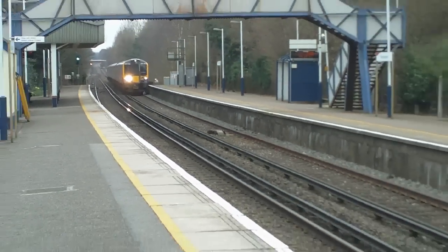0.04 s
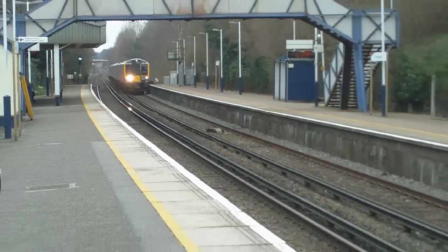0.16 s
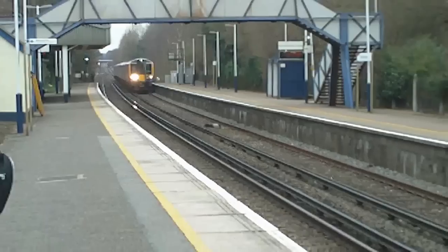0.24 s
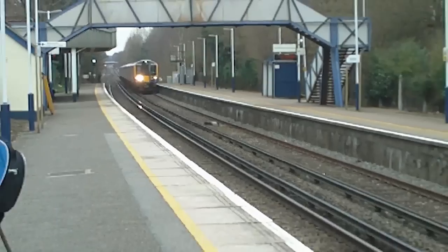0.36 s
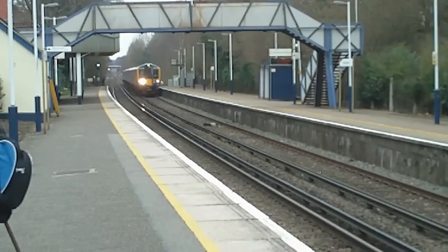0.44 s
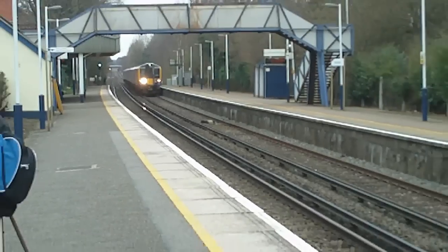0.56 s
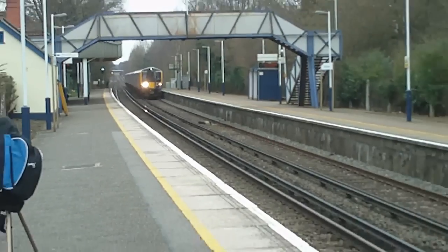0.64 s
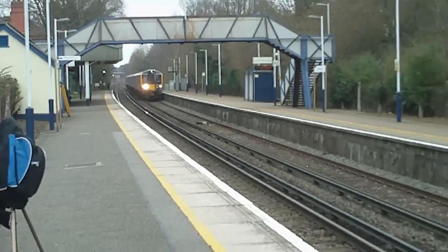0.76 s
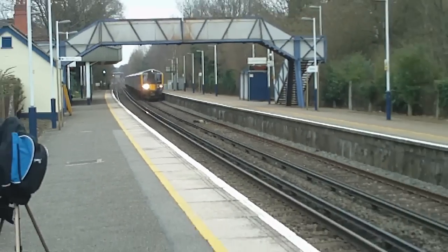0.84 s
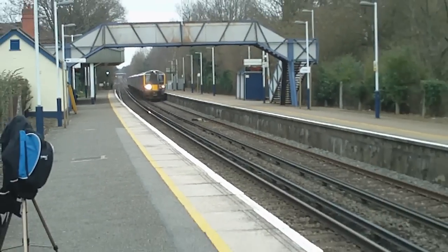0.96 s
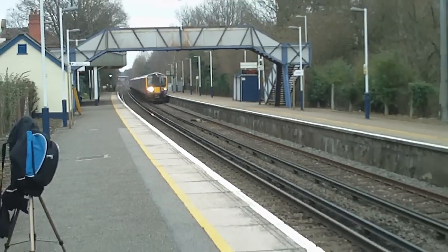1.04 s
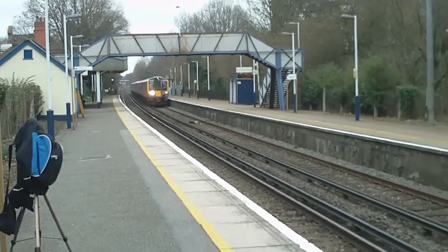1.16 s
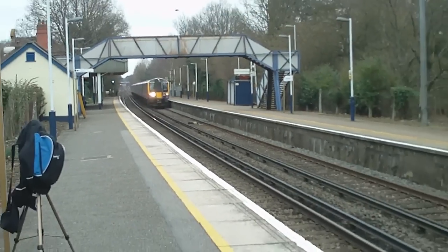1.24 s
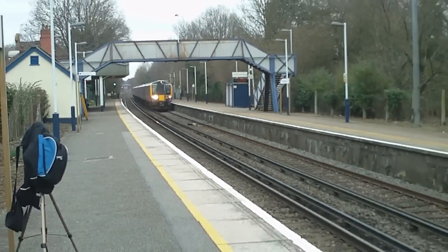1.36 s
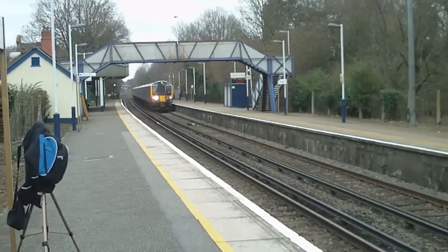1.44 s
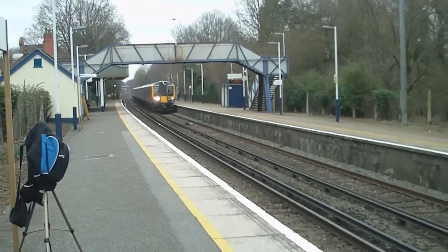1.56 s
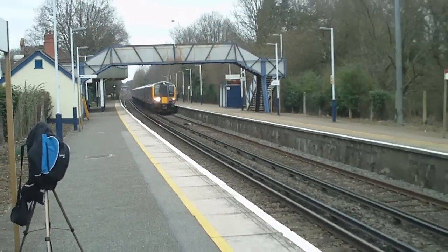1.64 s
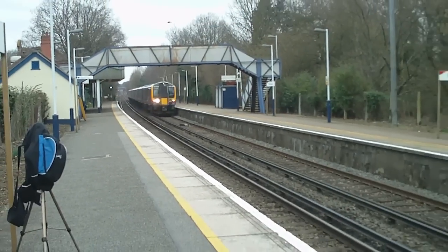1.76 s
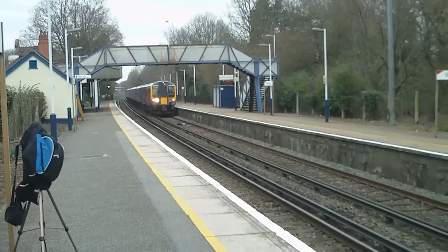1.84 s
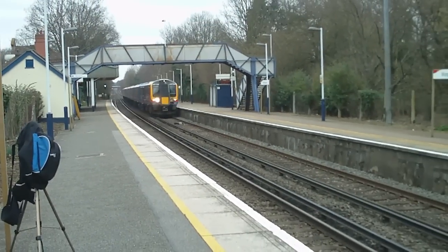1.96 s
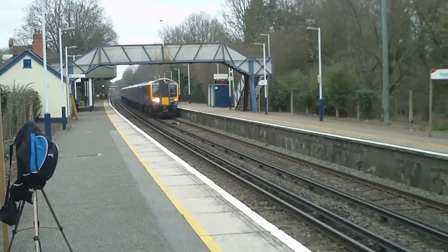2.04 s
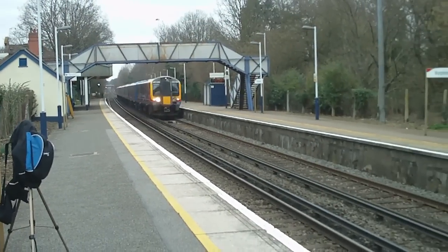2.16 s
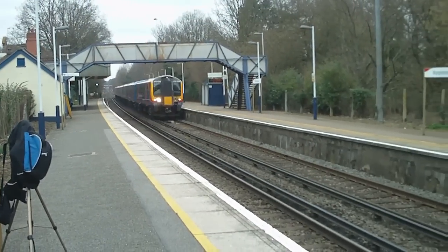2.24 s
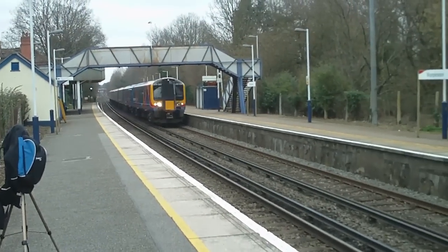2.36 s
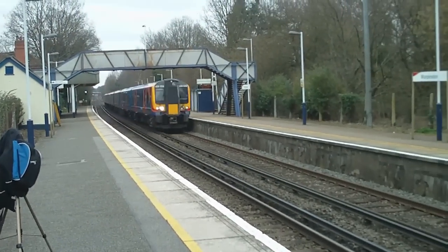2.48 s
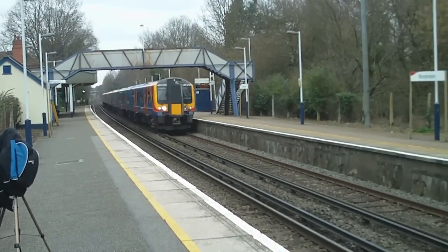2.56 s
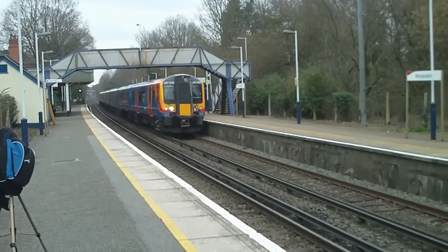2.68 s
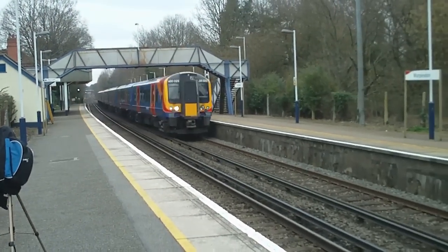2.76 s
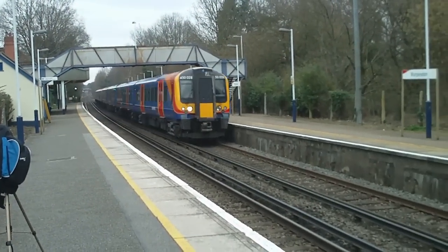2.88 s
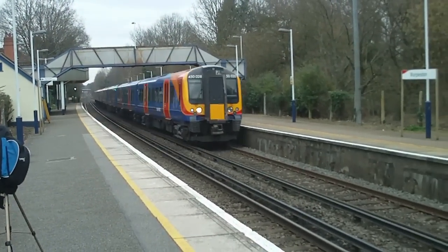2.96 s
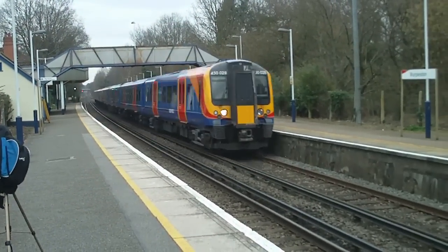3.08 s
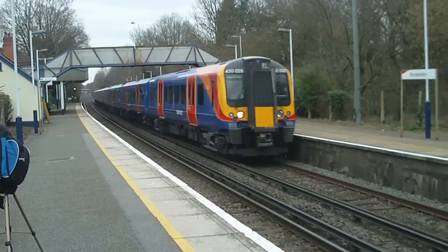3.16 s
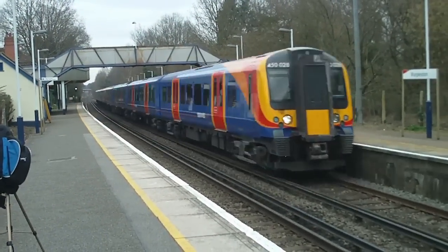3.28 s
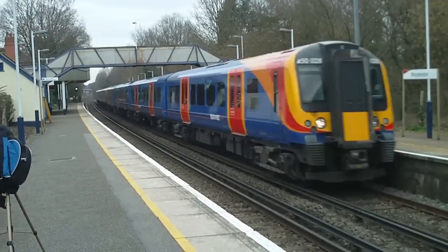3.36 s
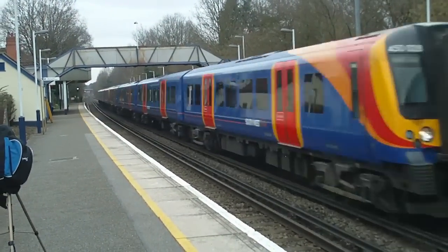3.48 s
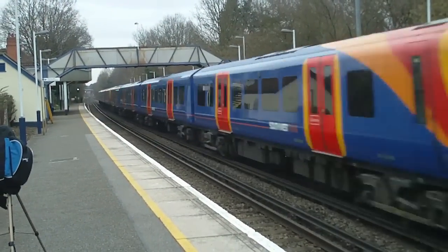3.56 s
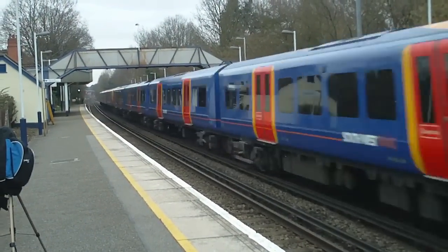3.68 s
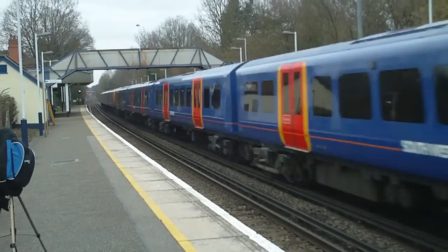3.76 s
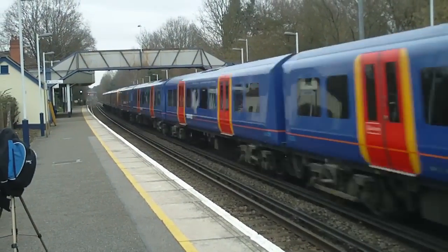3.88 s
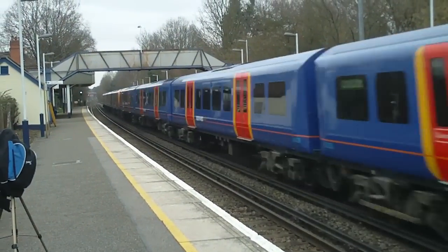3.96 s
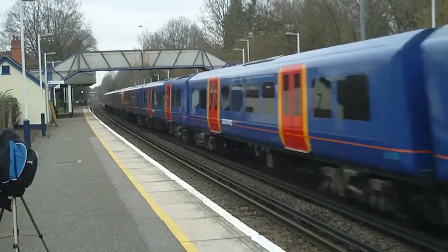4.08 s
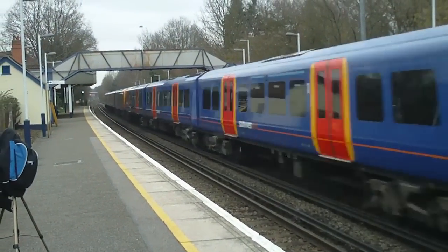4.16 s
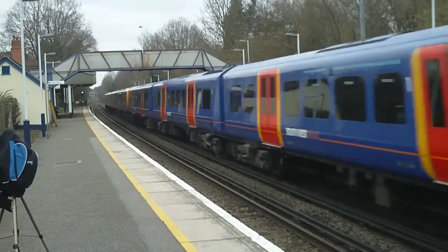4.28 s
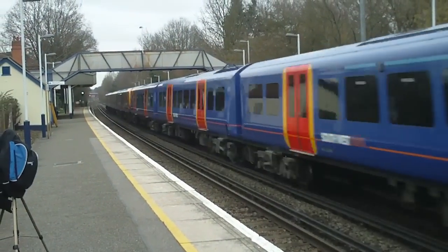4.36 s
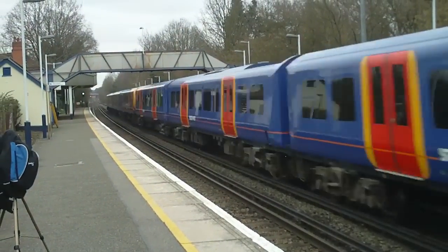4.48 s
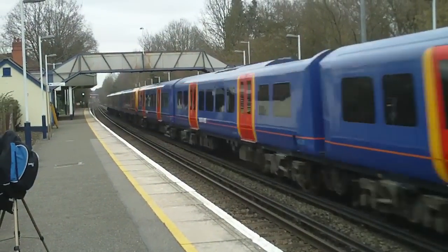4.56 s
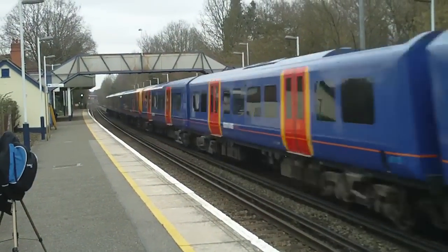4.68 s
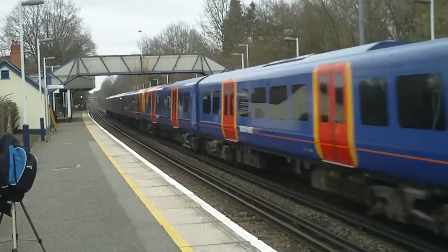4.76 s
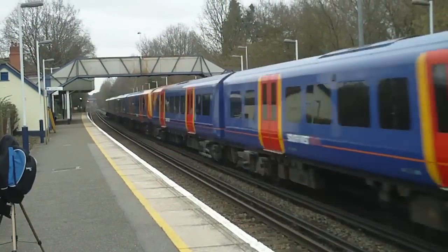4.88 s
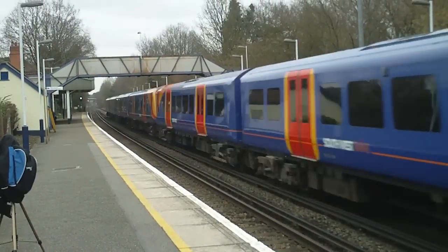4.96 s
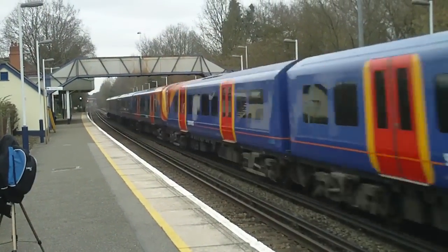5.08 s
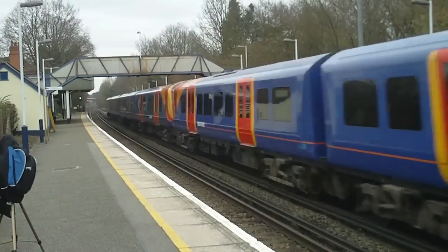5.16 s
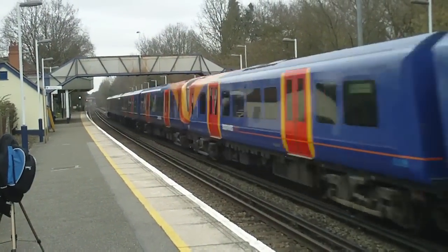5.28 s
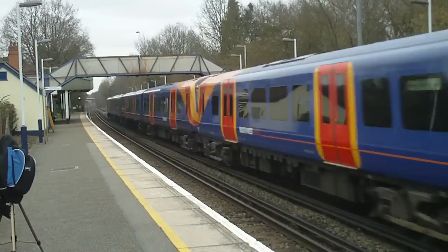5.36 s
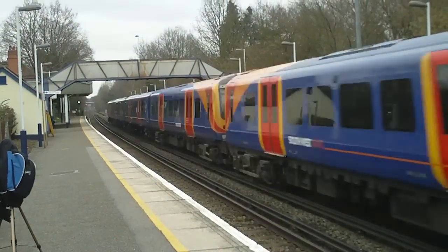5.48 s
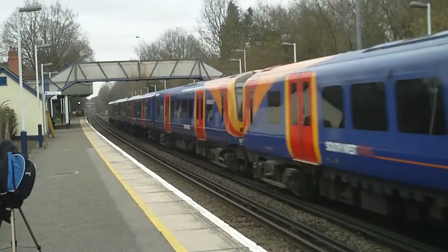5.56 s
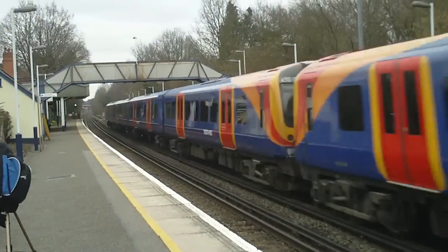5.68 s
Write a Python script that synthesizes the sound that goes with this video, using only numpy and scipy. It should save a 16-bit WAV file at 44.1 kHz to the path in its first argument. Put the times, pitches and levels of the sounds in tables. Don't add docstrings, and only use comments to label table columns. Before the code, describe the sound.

Outdoor stereo recording from a platform. At first only soft distant rumble, a faint bird note and thin, flickering rail ringing. The noise climbs steadily; one dry, hard camera click interrupts it about midway. The train's nose then sweeps by and wheel and wind noise stay strong, pulsing gently with each coach, with short squeals and tiny crackles.

```python
import sys
import numpy as np
from scipy import signal
from scipy.fft import rfft, irfft
from scipy.io import wavfile

SR = 44100
rng = np.random.default_rng(int(sys.argv[2]) if len(sys.argv) > 2 else 0)


def magnitude_from_level(level_db):
    exponent = np.asarray(level_db, float) / 20
    return 10 ** exponent


def transcribe(signal):
    frames = np.atleast_2d(signal).T
    limited = np.clip(frames, -1, 1)
    pcm = np.round(limited * 32767).astype(np.int16)
    wavfile.write(sys.argv[1], SR, pcm)


N = 252252

BAND_EDGES_HZ = [40, 330, 1000, 2200, 3500, 7500, 12000, 15500]
AIR_FROM_HZ = BAND_EDGES_HZ[4]
ARRIVAL_S, COACH_S = 3.606, 0.596
WHEELS_TURN_S = (3.46, 3.72)


def clock():
    return np.arange(N) / SR


def spectrum_hz():
    return np.maximum(np.arange(N // 2 + 1) * SR / N, 1)


def ramp(start_s, end_s):
    return np.clip((clock() - start_s) / (end_s - start_s), 0, 1)


def at_hz(points, hz):
    point_hz, point_db = np.transpose(points)
    return np.interp(np.log(hz), np.log(point_hz), point_db)


def together_db(*levels_db):
    return 10 * np.log10(sum(magnitude_from_level(db) ** 2 for db in levels_db))


def drift(rate_hz):
    r = np.exp(-80 * np.pi * rate_hz / SR)
    slow = signal.lfilter([1], [1, -2 * r, r * r], rng.standard_normal(N // 40 + 2002))
    slow = slow[2000:]
    return np.interp(np.arange(N) / 40, np.arange(len(slow)), slow / slow.std())


def resonate(x, hz, width_hz):
    r = np.exp(-np.pi * width_hz / SR)
    poles = [1, -2 * r * np.cos(2 * np.pi * hz / SR), r * r]
    return signal.lfilter([(1 - r * r) / 2, 0, (r * r - 1) / 2], poles, x)


def band_levels():
    # time in seconds, loudness in dB.
    approach = [
        (0.0, -53),
        (1.15, -47),
        (2.17, -41),
        (2.82, -35.5),
        (2.99, -35),
        (3.55, -25.5),
        (3.78, -21.5),
        (4.6, -19.5),
        (5.43, -19.5),
        (5.72, -18),
    ]
    # level alongside in dB, share of the approach followed,
    # quiet station in dB, swell per bogie pair in dB, gain in dB per second as the rake fills the platform.
    bands = [
        (-41, 1.03, -107, 1.5, -2),
        (-26, 0.99, -51.5, 2, -1.25),
        (-23, 1.26, -54.5, -0.35, 0.56),
        (-35.5, 0.93, -70, -0.2, 1.76),
        (-35, 1.16, -78, 0.5, -0.64),
        (-48, 1.25, -86.5, 0, -0.94),
        (-62.5, 0.85, -87, 1, -2),
    ]
    alongside_db, first_bogies_s = -21, 3.83
    lull_s, lull_length_s, lull_db = 3.98, .22, -3.0
    t = clock()
    closeness_db = np.interp(t, *np.transpose(approach))
    since_arrival = np.maximum(t - ARRIVAL_S, 0)
    lull = lull_db * np.exp(-(2 * (t - lull_s) / lull_length_s) ** 2)
    bogies = np.cos(2 * np.pi * (t - first_bogies_s) / COACH_S) * ramp(*WHEELS_TURN_S)
    levels = []
    for low_hz, (top_db, share, idle_db, swell_db, gain_db) in zip(BAND_EDGES_HZ, bands):
        train_db = top_db + share * (closeness_db - alongside_db)
        train_db = train_db + swell_db * bogies + gain_db * since_arrival
        if low_hz == BAND_EDGES_HZ[3]:
            train_db = train_db + lull
        levels.append(together_db(idle_db, train_db))
    return levels


def rolling():
    # frequency in Hz, level in dB per Hz.
    far_colour = [(20, -39), (130, -12.5), (290, -5.5), (420, -14), (540, -2), (850, -2), (1950, -5),
                  (2150, -14), (3200, -17), (3600, -27), (6300, -32.5), (7400, -37), (7800, -40),
                  (15700, -30)]
    # frequency in Hz, level in dB per Hz.
    near_colour = [(25, -59), (54, -22.5), (68, -33), (290, -8.5), (460, -6), (680, -2.5), (1450, -2.5),
                   (3150, -12.5), (3600, -18.5), (5800, -17), (7600, -27), (11700, -31.5), (12300, -38.5),
                   (15700, -42)]
    # frequency in Hz, side level in dB relative to mid.
    diffuse = [(30, -9), (60, -13), (125, -21), (250, -37), (500, -39), (1000, -39), (2000, -39),
               (4000, -18), (8000, -13), (15000, -1)]
    hz = spectrum_hz()
    white = rfft(rng.standard_normal((2, N)))
    white[1] *= magnitude_from_level(at_hz(diffuse, hz))
    shapes = [magnitude_from_level(at_hz(far_colour, hz)), magnitude_from_level(at_hz(near_colour, hz))]
    wheels_near = ramp(*WHEELS_TURN_S)
    air_near = ramp(1.6, 3) ** 2.2

    bands = list(zip(BAND_EDGES_HZ, BAND_EDGES_HZ[1:]))
    band_db = []
    for level_db, (low, high) in zip(band_levels(), bands):
        near = wheels_near if low < AIR_FROM_HZ else air_near
        inside = (hz > low) & (hz < high)
        far_rms, near_rms = [np.sqrt(np.sum(s[inside] ** 2) / len(hz)) for s in shapes]
        band_db.append(level_db - 20 * np.log10((1 - near) * far_rms + near * near_rms))
    band_db = np.array(band_db)

    middles = np.log2([np.sqrt(low * high) for low, high in bands])
    octaves, step = np.log2(hz), .64
    out = 0
    for octave in np.arange(4.4, 14.7, step):
        window = np.clip(1 - np.abs(octaves - octave) / step, 0, 1)
        far, close = [irfft(white * (window * s), N) for s in shapes]
        weights = np.array([np.interp(octave, middles, row) for row in np.eye(len(bands))])
        gain_db = weights @ band_db + 0.47 * drift(10.7) + 0.45 * drift(14.5)
        near = wheels_near if 2 ** octave < AIR_FROM_HZ else air_near
        out = out + magnitude_from_level(gain_db) * (far + near * (close - far))
    return out


def ringing(modes, level_db, flutter_db, rate_hz):
    out = 0
    for hz, width_hz, db in modes:
        tone = rng.standard_normal(N)
        for _ in range(2):
            tone = resonate(tone, hz, 1.5 * width_hz)
        out = out + magnitude_from_level(db + flutter_db * drift(rate_hz)) * tone / tone.std()
    return magnitude_from_level(level_db) * out


def rail_song():
    # frequency in Hz, width in Hz, level in dB.
    rail_modes = [(743, 133, -8), (1422, 107, -1), (1900, 59, -10), (2527, 290, -12)]
    idle_db, top_db, rise_db_per_s = -56.5, -32.5, 9.5
    trailer_db, trailers_end_s = 0.5, 5
    climb_db = top_db + rise_db_per_s * np.minimum(clock() - ARRIVAL_S, 0)
    trailers = ramp(ARRIVAL_S, ARRIVAL_S + COACH_S) - ramp(trailers_end_s, trailers_end_s + COACH_S / 2)
    level_db = together_db(idle_db, climb_db + trailer_db * trailers)
    return ringing(rail_modes, level_db, flutter_db=1.4, rate_hz=15.0)


def rail_singing():
    # frequency in Hz, width in Hz, level in dB.
    thin_modes = [(6640, 26, -15), (6690, 54, -4.5), (6950, 54, -1), (7300, 33, -11)]
    # time in seconds, level in dB.
    pings = [
        (.495, -64.5),
        (.95, -70),
        (1.15, -65),
        (1.5, -64.5),
        (1.7, -68),
        (1.9, -75),
        (2.7, -66),
    ]
    idle_db, top_db, rise_db_per_s = -78, -60.5, 7
    top_s, after_db = 3.5, 3
    attack_s, decay_db_per_s = 0.047, 47
    t = clock()
    climb_db = top_db + rise_db_per_s * np.minimum(t - top_s, 0) + after_db * ramp(top_s, ARRIVAL_S)
    flares = []
    for s, db in pings:
        fall_db = decay_db_per_s * np.clip(t - s, 0, 2)
        rise_db = 20 * np.clip((s - t) / attack_s, 0, 5)
        flares.append(db - fall_db - rise_db)
    level_db = together_db(idle_db, climb_db, *flares)
    return ringing(thin_modes, level_db, flutter_db=2.2, rate_hz=16.0)


def friction(rows):
    out, t = np.zeros(N), np.arange(-SR // 2, SR // 2) / SR
    for s, length, hz, width_hz, db in rows:
        tone = rng.standard_normal(SR)
        for _ in range(2):
            tone = resonate(tone, hz, width_hz)
        at = np.clip(round(s * SR) + np.arange(-SR // 2, SR // 2), 0, N - 1)
        shape = np.exp(-(2 * t / length) ** 2)
        out[at] += magnitude_from_level(db) * shape * tone / np.sqrt(np.average(tone ** 2, weights=shape ** 2))
    return out


def flange_squeals():
    # centre in seconds, length in seconds, frequency in Hz, level in dB.
    squeal_rows = [(0.272, .04, 3040, -63), (.36, .08, 14000, -80), (.446, 0.23, 1640, -55),
                   (.45, 0.2, 1900, -55), (.9, .1, 1900, -56), (1.391, .088, 1894, -49.5),
                   (.52, .08, 14000, -83), (.98, 0.16, 14100, -83), (1.6, .3, 13600, -93),
                   (1.207, .03, 3065, -57), (1.43, .04, 3053, -59), (1.518, 0.1, 3010, -55),
                   (2.72, .024, 6300, -63), (3.508, .08, 1390, -32), (3.604, 0.032, 1368, -26),
                   (3.159, 0.07, 1380, -32), (3.655, 0.031, 1446, -19), (3.729, 0.086, 1413, -26),
                   (3.802, .055, 1675, -27), (4.057, .04, 1493, -23), (5.062, 0.033, 1307, -21.5),
                   (5.646, 0.061, 1417, -26.5)]
    width_hz = 55
    return friction([(s, length, hz, width_hz, db) for s, length, hz, db in squeal_rows])


def broad_rubs():
    # centre in seconds, length in seconds, frequency in Hz, width in Hz, level in dB.
    rub_rows = [(3.0, .4, 9300, 3000, -65), (3.47, 0.13, 8500, 2500, -52), (5.62, 0.38, 650, 360, -25.5),
                (2.7, 0.71, 1440, 70, -43), (.45, 0.38, 820, 500, -54.5), (2.1, 0.71, 220, 240, -57),
                (1.86, 0.11, 370, 150, -53), (1.13, 0.14, 2900, 700, -57), (1.38, 0.22, 640, 400, -51),
                (3.12, 0.38, 4900, 700, -54), (3.45, 0.31, 5070, 600, -42.5), (3.701, 0.4, 734, 340, -28),
                (3.78, 0.4, 2940, 730, -37), (4.45, 0.12, 990, 119, -29.5), (4.857, 0.22, 1264, 210, -23.5)]
    return friction(rub_rows)


def sparks():
    # start in seconds, peak in dB, lowest frequency in Hz, highest frequency in Hz.
    spark_rows = [(.652, -52, 3000, 3800), (.705, -53, 5000, 7200), (.720, -51, 3800, 6200),
                  (1.672, -60, 13000, 16000), (2.4165, -41, 4800, 9500), (2.71, -54, 11000, 16000),
                  (3.729, -40, 11000, 16000), (4.199, -40, 11000, 16000), (4.58, -44, 11000, 16000),
                  (4.88, -41, 11000, 16000), (5.01, -44, 11000, 16000), (5.176, -37, 9000, 16000)]
    decay_s = .0012
    out, t = np.zeros(N), np.arange(400) / SR
    for s, db, low_hz, high_hz in spark_rows:
        band = signal.butter(2, [low_hz, high_hz], "band", fs=SR, output="sos")
        burst = signal.sosfilt(band, rng.standard_normal(len(t)) * np.exp(-t / decay_s))
        out[round(s * SR):][:len(t)] += magnitude_from_level(db) * burst / np.abs(burst).max()
    return out


def shutter():
    # time in seconds, level in dB, brightness in dB per octave.
    contacts = [
        (2.4165, -38, 4),
        (2.43528, -17.5, 2),
        (2.43576, -13, 0),
        (2.43639, -14.5, 7.5),
        (2.43739, -10, 9.5),
        (2.43786, 1.5, 6),
        (2.43903, 2.5, -1),
        (2.44047, -8.5, -1.5),
        (2.44085, -12.5, -5),
        (2.44319, -37, 11),
    ]
    # frequency in Hz, level in dB, time to fall 60 dB in seconds.
    body = [(630, -18, .0103), (870, -16, .0158), (1530, -13.5, .0046), (2220, -6, .0044),
            (3010, .5, .0036), (3910, -.5, .0028), (4440, -6.5, .0039), (6210, -12, .0054),
            (6300, -36, .04), (5900, -30, .0194), (8880, -32.5, .0068), (9370, -30, .0011),
            (12060, -35.5, .0049), (13400, -46, .003)]
    s, db, tilt_db = np.transpose(contacts)
    at = np.round(s * SR).astype(int)
    out = np.zeros(N)
    for k, (hz, mode_db, t60) in enumerate(body):
        signs = (-1) ** (k + np.arange(len(s)))
        clicks = np.full(N, 1e-18)
        clicks[at] = signs * magnitude_from_level(db + mode_db + tilt_db * np.log2(hz / 3000))
        r, w = magnitude_from_level(-60 / (t60 * SR)), 2 * np.pi * hz / SR
        out += signal.lfilter([0, np.sin(w)], [1, -2 * r * np.cos(w), r * r], clicks)
    return signal.sosfilt(signal.butter(3, 380, "high", fs=SR, output="sos"), out)


def bird():
    # start in seconds, length in seconds, frequency in Hz, glide in Hz per second, level in dB.
    whistle = [
        (.012, .08, 4225, -300, -70),
        (.09, .07, 4110, 1300, -70),
        (.18, .035, 4130, 100, -77),
    ]
    edge_s, fade_db_per_s = .008, 50
    out, t, waver_db = 0, clock(), 2.6 * drift(45)
    for s, length, hz, glide, db in whistle:
        since = np.clip(t - s, -1, 1)
        end = s + length
        shape = ramp(s - edge_s, s + edge_s) - ramp(end - edge_s, end + edge_s)
        phase = 2 * np.pi * (hz * since + glide * since ** 2 / 2)
        gain = np.sqrt(2) * shape * magnitude_from_level(db - fade_db_per_s * since + waver_db)
        out = out + gain * (np.sin(phase) + magnitude_from_level(-12) * np.sin(1.19 * phase))
    return out


def steady_whine():
    # frequency in Hz, width in Hz, level in dB.
    whine_modes = [(11550, 90, -86.5), (7850, 60, -90)]
    return ringing(whine_modes, 0, flutter_db=-1.0, rate_hz=4.9)


def port_lag(mid):
    # frequency in Hz, side level in dB relative to mid.
    lag_points = [(100, -44), (700, -31.5), (1400, -25), (2800, -14.5), (5600, -8.5), (10000, -3),
                  (15000, -0.5)]
    return irfft(-1j * rfft(mid) * magnitude_from_level(at_hz(lag_points, spectrum_hz())), N)


def scene():
    mid, side = rolling()
    mid = mid + rail_song() + rail_singing()
    mid = mid + flange_squeals() + broad_rubs() + sparks()
    mid = mid + shutter() + bird() + steady_whine()
    side = side + port_lag(mid)
    return np.array([mid + side, mid - side])


def low_pass(x):
    return signal.sosfilt(signal.butter(12, 16470, fs=SR, output="sos"), x)


def record(dry):
    rounded = 1.4 * np.tanh(dry / 1.4)
    top_cut = signal.ellip(10, .5, 50, 15720, fs=SR, output="sos")
    return low_pass(signal.sosfilt(top_cut, rounded))


dry = scene()
out = record(dry)
transcribe(out)
```